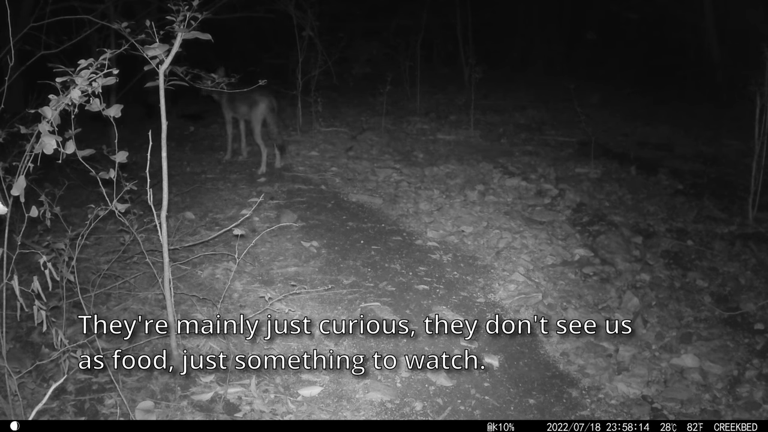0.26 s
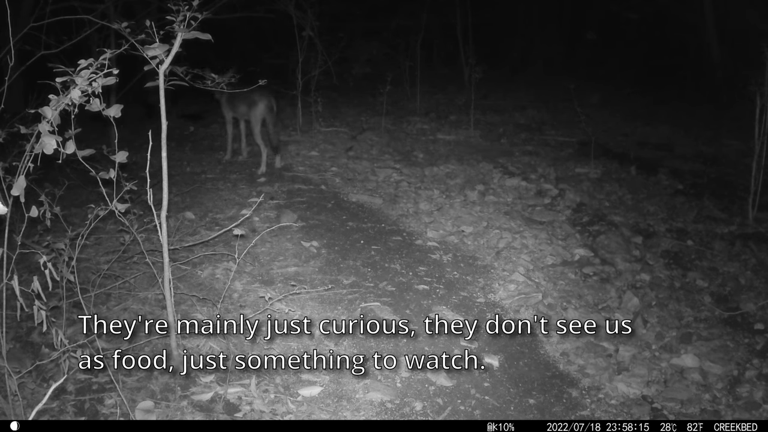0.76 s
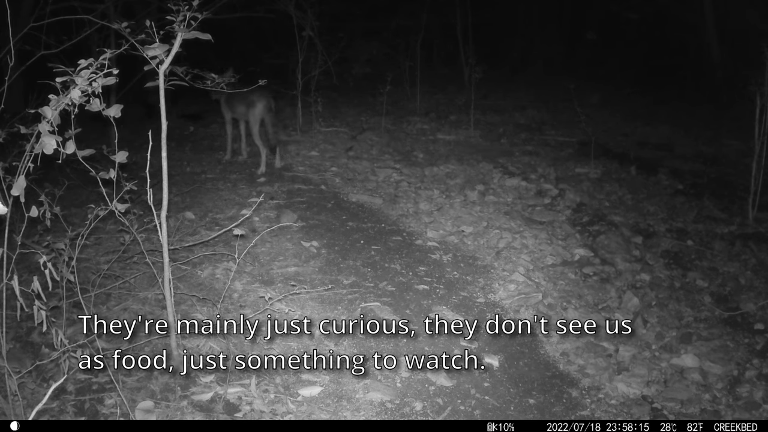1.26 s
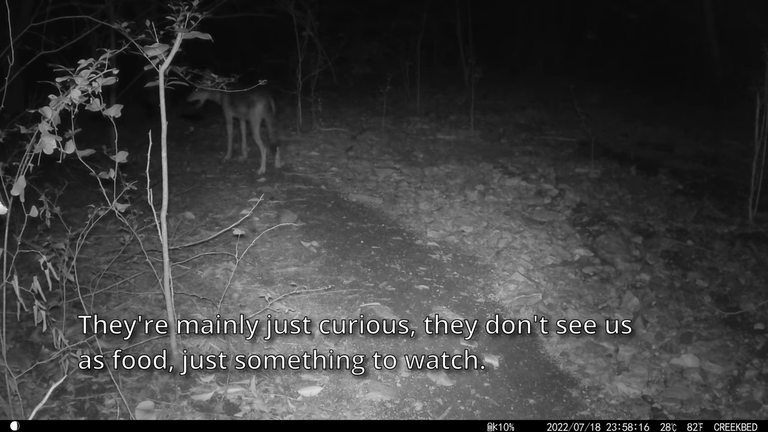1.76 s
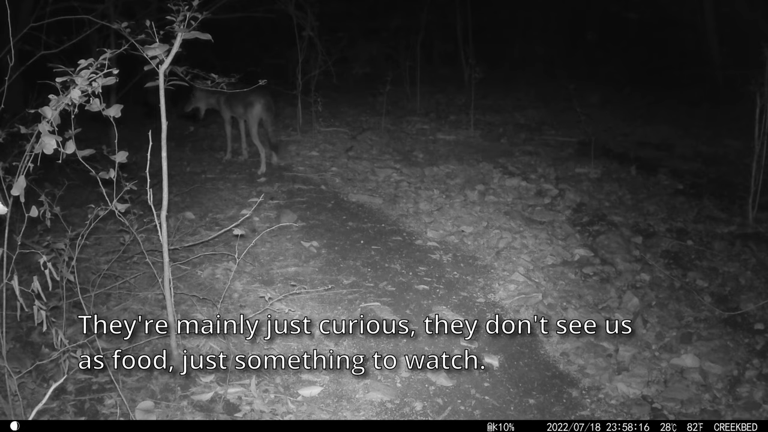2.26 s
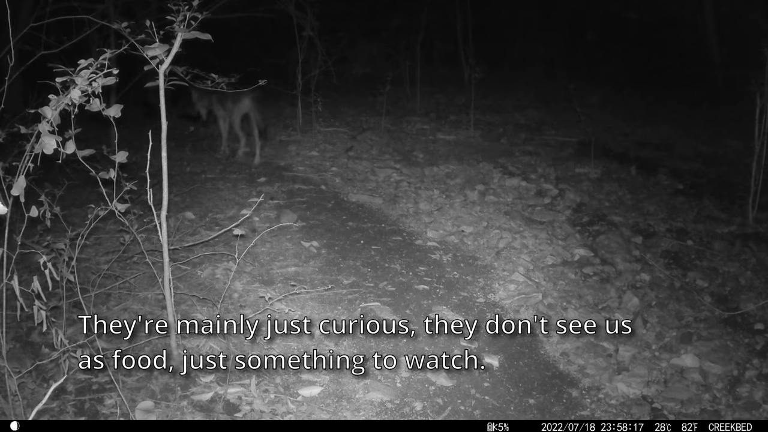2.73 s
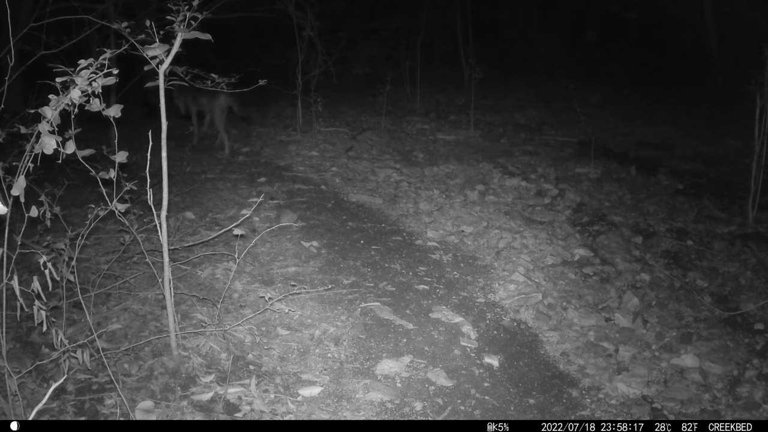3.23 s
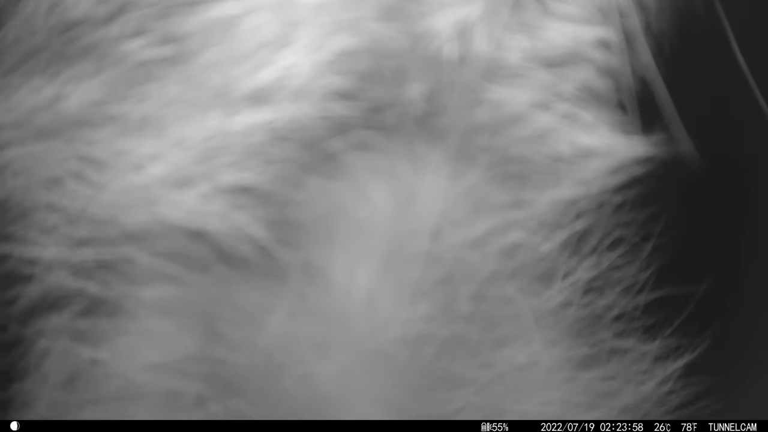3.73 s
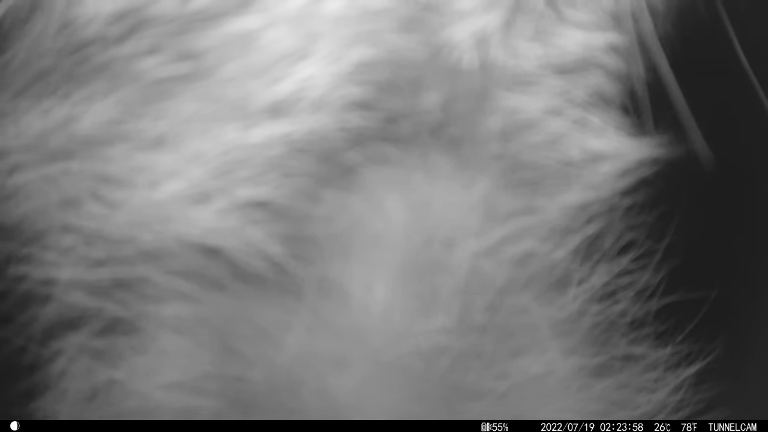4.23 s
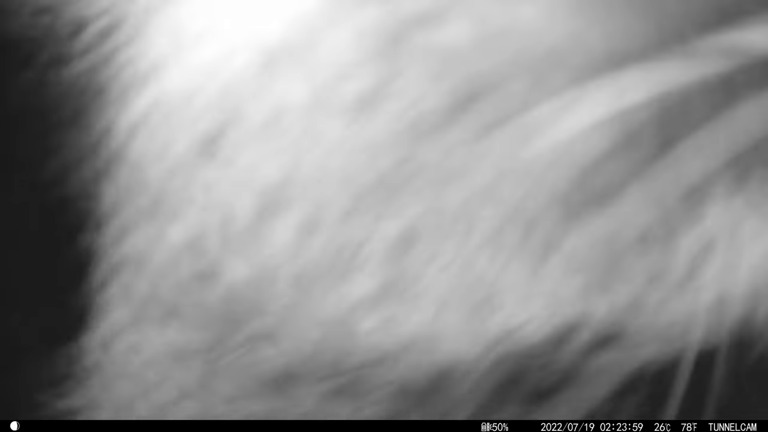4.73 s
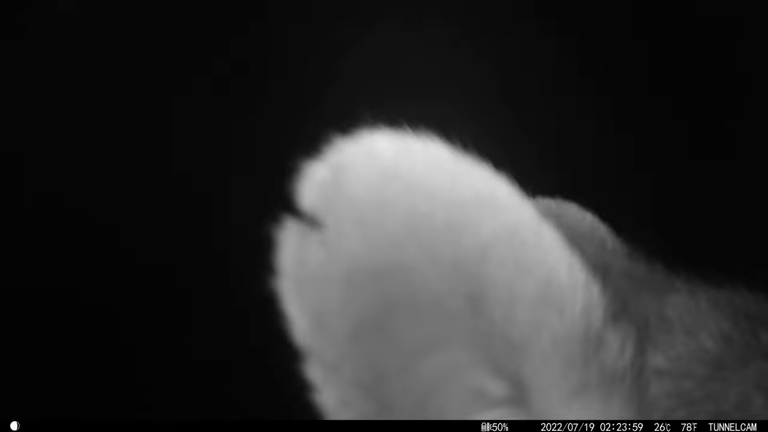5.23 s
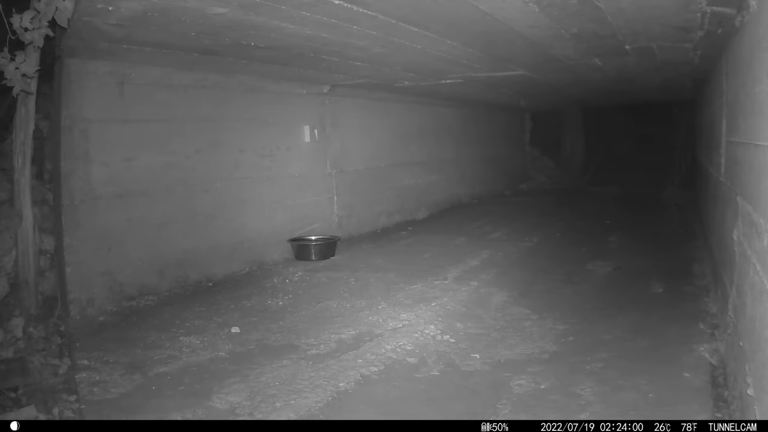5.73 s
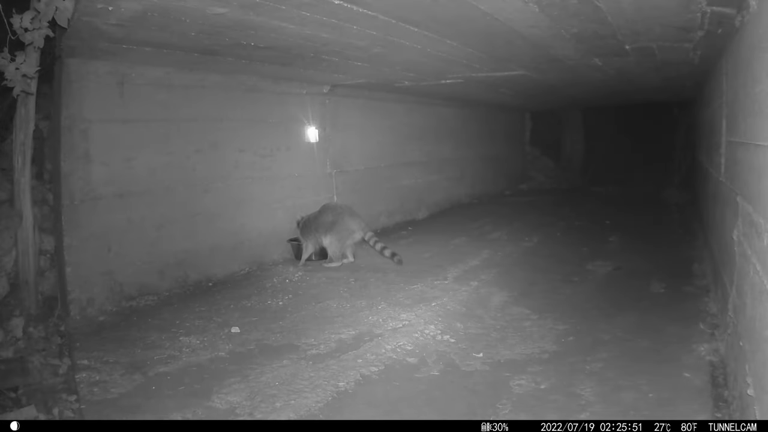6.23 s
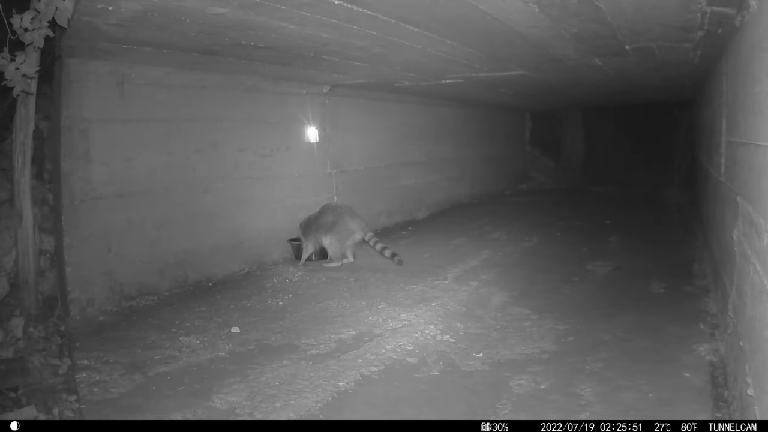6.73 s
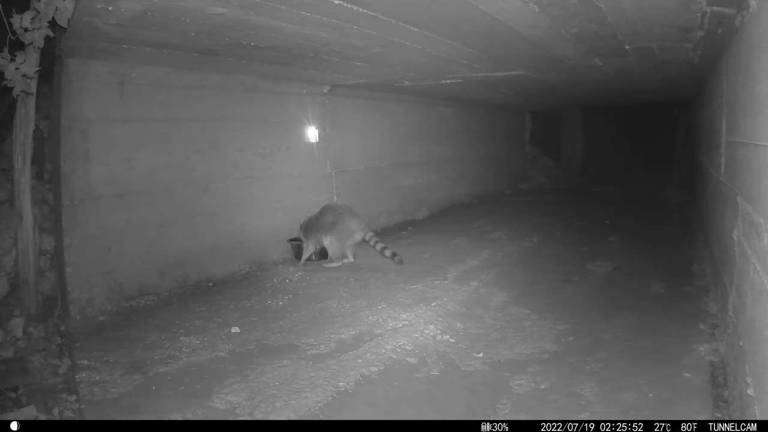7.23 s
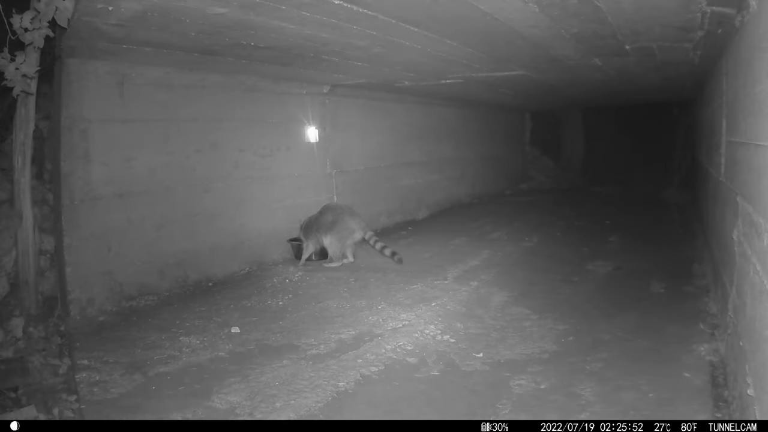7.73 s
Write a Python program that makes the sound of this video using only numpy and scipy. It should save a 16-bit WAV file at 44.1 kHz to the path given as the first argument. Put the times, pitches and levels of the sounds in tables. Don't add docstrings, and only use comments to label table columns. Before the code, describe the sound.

Steady cricket trills and katydid scrapes in a night wood cut abruptly to thumps, a brief electronic whine, and an echoing lower trill with paired chirps.

```python
import sys
import numpy as np
from scipy import signal
from scipy.io import wavfile
from scipy.ndimage import uniform_filter1d

SR = 44100
rng = np.random.default_rng(int(sys.argv[2]) if len(sys.argv) > 2 else 0)


def voltage_ratio(decibels):
    exponent = np.asarray(decibels, float) / 20
    return 10 ** exponent


def wrap_up_sound(samples):
    columns = np.atleast_2d(samples).T
    tamed = np.clip(columns, -1, 1)
    steps = np.round(tamed * 32767).astype(np.int16)
    wavfile.write(sys.argv[1], SR, steps)


N = 352359
TIME = np.arange(N) / SR
CUT_S, WAKE_S = 3.4665, 3.4846

# [start_s, pitch_hz of the middle line, level_db, smear 0-1]
NEAR_TRILL = [
    (0, 4150, -50.5, .3),
    (.3, 4190, -50, .3),
    (.85, 4214, -50.5, .3),
    (1.5, 4198, -51.5, .3),
    (2.0, 4165, -51.5, .4),
    (2.3, 4135, -53, .7),
    (2.5, 4120, -59, .9),
]
JOINING_TRILL = [
    (1.2, 4262, -69, .6),
    (1.45, 4260, -56, .55),
    (1.8, 4256, -51.5, .55),
    (3.47, 4256, -51.5, .6),
]
TUNNEL_TRILL = [
    (3.48, 3948, -48.5, .98),
    (4.3, 3948, -49, .95),
    (4.8, 3948, -51.5, 1),
    (5.4, 3948, -52, 1),
    (6.25, 3946, -50.5, 1),
    (6.4, 3947, -49.5, .8),
    (8, 3947, -49.5, .86),
]
NEAR_LINES = -4, 85.8, [-22, -11, -4, -5, 0, -1, -8, -15, -16, -22, -20, -25]
JOINING_LINES = -3, 84., [-16, -14, -11, 0, -8, -16, -20]
TUNNEL_LINES = -3, 78.8, [-10, -9, -1, 0, -3.5, -16, -15]


def trill(rows, lines, blur_hz, glide, stumbles_s=()):
    hz, level_db, smear = curves(rows)
    smear = np.clip(smear + sum(.5 * bump(s, .11) for s in stumbles_s), 0, 1)
    first, rate, line_db = lines
    stroke_hz = rate * hz / hz.mean()
    tone, strokes = np.exp(2j * np.pi * np.cumsum([hz, stroke_hz], axis=1) / SR)
    line = tone * strokes ** round(first)
    restart = np.exp(2j * np.angle(drift(blur_hz) + 1.1))
    out = np.zeros(N)
    for k, db in enumerate(line_db, round(first)):
        blur = .75 * restart + .65 * drift(blur_hz)
        path = np.sqrt(1 - smear ** 2) * (1 + .22 * drift(4)) + smear * blur
        phase = np.exp(2j * np.pi * glide * k ** 2)
        out += voltage_ratio(db) * (path * line * phase).real
        line = line * strokes
    return voltage_ratio(level_db) * evened(out)


# [first_stroke_s, peak_db]
CHIRPS = [(3.582, -39.5), (3.861, -41.5), (4.134, -42.5), (4.418, -43.5), (4.697, -42), (4.962, -44.5),
          (5.258, -44.5), (5.542, -41.5), (5.821, -41), (6.091, -36.5), (6.55, -38.5), (6.839, -39.5),
          (7.16, -39.5), (7.442, -37.5), (7.74, -38.5), (7.976, -38.5)]


def chirps():
    pair_gap_s, second_db = .0333, .6
    pitch_hz, spread_hz, spread_db = 4211, 26, 1
    sag_hz_per_s, deepen_hz_per_s = 8.9, 36
    out = np.zeros(N + SR)
    strokes = [(s + k * pair_gap_s, db + k * second_db) for s, db in CHIRPS for k in (0, 1)]
    chances = rng.uniform(-1, 1, (len(strokes), 4))
    for (s, db), (longer, deeper, higher, louder) in zip(strokes, chances):
        t = np.arange(round(.0185 * (1 + .12 * longer) * SR)) / SR
        part = t / t[-1]
        awake_s = s - WAKE_S
        start_hz = pitch_hz - sag_hz_per_s * awake_s + spread_hz * higher + 30
        sink_hz = (90 + deepen_hz_per_s * awake_s) * (1 + .089 * deeper)
        tone = np.sin(2 * np.pi * np.cumsum(start_hz - sink_hz * part ** 2) / SR)
        shape = signal.windows.tukey(len(t), .6) * (.88 + .25 * part)
        at = round((s - .0045) * SR)
        out[at:at + len(t)] += voltage_ratio(db + spread_db * louder) * shape * tone
    tail = rng.standard_normal(SR // 2) * voltage_ratio(-60 * TIME[:SR // 2] / .15)
    echo = signal.fftconvolve(out, tail / np.linalg.norm(tail))[:N]
    return out[:N] + voltage_ratio(-14) * echo


# [middle_s, length_s, peak_db, pitch_hz]
WOOD_KATYDIDS = [(.13, .15, -64, 7700), (.46, 0.7, -60.5, 7800), (.98, 0.62, -68, 7850),
                 (1.22, 0.43, -65, 7550), (1.64, 0.38, -59.5, 7830), (1.96, .12, -63, 7800),
                 (2.12, 0.29, -63, 8000), (2.33, .2, -65, 7850), (2.56, 0.3, -60.5, 7800),
                 (2.74, .15, -65, 7830), (3.01, 0.42, -63.5, 7800), (3.46, 0.16, -61.5, 8000)]
TUNNEL_KATYDIDS = [
    (4.45, .3, -75, 7700),
    (4.97, .25, -71, 7300),
    (5.93, .2, -71, 7300),
    (6.15, .3, -74, 7800),
    (6.75, .5, -78, 7650),
    (7.3, .6, -75, 7550),
    (7.85, .4, -72, 7650),
]
# [level_db, pitch_hz]
CHORUS = (-67.5, 7780), (-76, 7600)


def katydids(bouts, chorus, width_hz):
    chorus_db, chorus_hz = chorus
    gains = [voltage_ratio(db) * bump(s, length) for s, length, db, _ in bouts]
    gains = np.array(gains + [voltage_ratio(chorus_db) + 0 * TIME])
    power = (gains ** 2).sum(0)
    hz = np.array([row[-1] for row in bouts] + [chorus_hz]) @ gains ** 2 / power
    out = np.zeros(N)
    for offset_hz in (-260, 0, 240):
        click_db = 3 * drift(6).real + 2.5 * drift(50).real - abs(offset_hz) / 70
        clicks = rng.standard_normal(N) * voltage_ratio(click_db)
        wing_hz = hz + offset_hz + 90 * drift(4).real
        out += evened(resonate(clicks, wing_hz, width_hz)) * clicks.std()
    return np.sqrt(power) * evened(out)


# [start_s, peak_db, pitch_hz, width_hz, fade_s to -60 dB]
TAPS = [(2.085, -55, 6960, 2500, .08), (2.603, -52, 6300, 2500, .03), (2.72, -56, 6350, 300, .05),
        (2.74, -55, 6330, 300, 0.041), (6.235, -48.5, 320, 300, 0.052), (6.289, -43, 3180, 1200, 0.038),
        (6.311, -60, 2800, 1200, 0.08), (6.35, -61, 1120, 130, 0.13), (6.385, -62, 1110, 120, 0.43),
        (6.48, -61, 1240, 300, 0.22), (3.399, -65, 3520, 60, 0.29), (6.565, -58, 550, 300, 0.067),
        (6.874, -48.5, 2420, 2000, 0.078), (6.876, -54, 550, 400, 0.066), (6.92, -53, 2900, 1800, 0.07),
        (7.775, -54.5, 1610, 497, 0.081)]


def taps():
    out, t = np.zeros(N + SR), TIME[:SR // 5]
    for s, db, hz, width_hz, fade_s in TAPS:
        at = round(s * SR)
        ring = evened(resonate(rng.standard_normal(len(t)), hz, width_hz))
        out[at:at + len(t)] += voltage_ratio(db - 60 * t / fade_s) * ring * np.minimum(t / .0025, 1)
    return out[:N]


# [time_s, level_db]
ENGINE = [
    (4.4, -63),
    (5.4, -67.5),
    (6.6, -60),
    (7.99, -53.5),
]


def engine():
    level_db = curves(ENGINE)[0] + .5
    return voltage_ratio(level_db) * evened(resonate(rng.standard_normal(N), 133.8, 31.7))


# [pitch_hz, level_db per Hz]
WOOD_AIR = [(120, -46), (200, 2), (236, -3), (377, -9), (856, -9), (1880, -15), (3300, -23), (4290, -26),
            (7260, -120)]
TUNNEL_AIR = [(120, -32), (200, -6), (247, -3.5), (744, -9.5), (1110, -10.5), (1450, -12), (3300, -18),
              (4290, -32), (7260, -120)]
WOOD_RUMBLE = [(7.1, -33), (12, -12), (42, 3.5), (67, 2), (130, -6.5), (151, -8.5), (172, -16), (204, -33),
               (232, -31), (260, -25), (340, -75), (570, -120)]
TUNNEL_RUMBLE = [(7, -33), (12, -6.5), (32, 0), (45, -1), (58, -5), (76, -16.5), (97, -20.5), (135, -21),
                 (181, -23.5), (260, -33.5), (340, -56)]
HISS = [(1500, -23), (3000, 2), (6000, 2), (9000, 0.5), (12400, 1.5), (15300, -16), (15700, -60)]
# [rumble_db, air_db, share of a swell that the air follows]
TRAFFIC = (-47.5, -58, 0.1), (-44.5, -61, -0.04)
# [middle_s, length_s, rise_db]
SWELLS = [
    [(.3, .5, 2.5), (1.35, 0.3, 3.1), (2.4, 2.2, 5), (3.2, 0.39, 3.7)],
    [(4.02, .5, 4), (4.9, 0.34, 2.7), (6.5, 2, 3.2), (7.55, 0.31, 1.8)],
]


def place(rumble, air, index, hiss_db):
    rumble_db, air_db, share = TRAFFIC[index]
    swell_db = sum(db * bump(s, length) for s, length, db in SWELLS[index])
    out = voltage_ratio(rumble_db + swell_db) * noise(rumble, .62, size=8192)
    out += voltage_ratio(air_db + share * swell_db) * noise(air, .88, size=2048)
    return out + voltage_ratio(hiss_db) * noise(HISS, .89, size=1024)


def noise(shape, patchy_db, size):
    hz = np.fft.rfftfreq(size, 1 / SR)
    a, b, patches = rng.standard_normal((4 * N // size + 5, len(hz), 3)).T
    patches = uniform_filter1d(patches, size=20, axis=0)
    patches = evened(uniform_filter1d(patches, size=5, axis=1))
    f, db = np.transpose(shape)
    colour_db = np.interp(np.log(hz + 1), np.log(f + 1), db)[:, None]
    z = (a + 1j * b) * voltage_ratio(colour_db + patchy_db * patches)
    return evened(signal.istft(z, nperseg=size, noverlap=3 * size // 4)[1][:N])


def resonate(x, hz, width_hz):
    turn = np.exp(2j * np.pi * np.cumsum(hz * np.ones(len(x))) / SR)
    r = np.exp(-np.pi * width_hz / SR)
    return (turn * signal.lfilter([1], np.convolve([1, -r], [1, -r]), x / turn)).real


def drift(hz):
    count = N // 64 + 2
    z = rng.standard_normal(count) + 1j * rng.standard_normal(count)
    z = evened(signal.lfilter(*signal.butter(2, hz, fs=SR / 64), z))
    return np.interp(np.arange(N) / 64, np.arange(count), z)


def bump(middle_s, length_s):
    return np.maximum(1 - (2 * (TIME - middle_s) / length_s) ** 2, 0) ** 2


def curves(rows):
    s, *columns = np.transpose(rows)
    return [np.interp(TIME, s, c) for c in columns]


def evened(x):
    return x / np.sqrt(np.mean(abs(x) ** 2) + 1e-20)


def scene():
    wood = trill(NEAR_TRILL, NEAR_LINES, 25, .12, stumbles_s=[.79, 1.08])
    wood += trill(JOINING_TRILL, JOINING_LINES, 25, .1, stumbles_s=[2.2, 2.83])
    wood += katydids(WOOD_KATYDIDS, CHORUS[0], 540)
    wood += place(WOOD_RUMBLE, WOOD_AIR, index=0, hiss_db=-61)
    tunnel = trill(TUNNEL_TRILL, TUNNEL_LINES, 18, .105)
    tunnel += chirps() + katydids(TUNNEL_KATYDIDS, CHORUS[1], 400) + engine()
    tunnel += place(TUNNEL_RUMBLE, TUNNEL_AIR, index=1, hiss_db=-62.5)
    left = wood * (TIME < CUT_S) + tunnel * (TIME >= WAKE_S) + taps()
    return np.array([2 * left, 0 * left])


# [start_s, level_db from then on]
GAIN_STEPS = [
    (3.4846, -2),
    (3.5488, 4.5),
    (3.8147, 3),
    (4.0066, 1.5),
    (4.2791, 0),
]


def gain_steps(x):
    s, step_db = np.transpose(GAIN_STEPS)
    return x * voltage_ratio(np.append(0, step_db)[np.searchsorted(s, TIME)])


# [start_s, size of full scale, decay_s]
JOLTS = [
    (3.5488, .24, .005),
    (3.8147, -.08, .0012),
    (4.0066, -.03, .003),
    (4.2791, -.02, .002),
]


def jolts():
    out = np.zeros(N)
    for at, size, decay_s in JOLTS:
        out += size * np.exp(-abs(TIME - at) / decay_s) * np.clip((TIME - at) / 5e-5, 0, 1)
    return out


def bias():
    t, late = TIME - WAKE_S, np.maximum(TIME - JOLTS[0][0], 0)
    surge = .13 * (1 - .45 * np.exp(-abs(t) / .004)) * np.cos(np.pi / 2 * t / .075)
    kick = .125 * np.exp(-late / .028)
    undershoot = .06 * (1 + late / .22) * np.exp(-late / .22)
    return np.where(late > 0, kick - undershoot, surge) * (t >= 0)


def whine(x):
    start_s, end_s, top_hz = 3.8, 4.29, 17000
    slow = signal.lfilter(*signal.butter(2, 160, fs=SR), x)
    settling = np.exp((start_s - np.maximum(TIME, start_s)) / .29)
    drive_hz = 30000 - 65000 * settling - 170000 * slow
    hz = top_hz * np.tanh(drive_hz / top_hz) + 800 * drift(300).real
    heard = np.clip((15600 - abs(hz)) / 500, 0, 1) * (TIME > start_s) * (TIME < end_s)
    turn = 2 * np.pi * np.cumsum(hz) / SR
    overtone = .4 * np.sin(2 * turn) * (abs(hz) < 5500)
    level_db = -45 - .0001 * abs(hz) + 1.9 * drift(73).real
    return voltage_ratio(level_db) * heard * (np.sin(turn) + overtone)


TOP_BANDS_HZ = [12650, 13400, 14100, 14800, 15500]


def top_gate(x, open_db):
    hz, t, z = signal.stft(x, SR, nperseg=512)
    for lo, hi in zip(TOP_BANDS_HZ, TOP_BANDS_HZ[1:]):
        band = (hz >= lo) & (hz < hi)
        busy = uniform_filter1d((abs(z[band]) ** 2).sum(0), size=15) > voltage_ratio(2 * open_db)
        waking = (t > 3.47) & (t < 3.58 + .04 * (lo < 14500))
        again = (abs(t - 3.72) < .025) & (lo > 13000) & (hi < 15000)
        z[band] *= busy | waking | again
    z[hz >= hi] = 0
    return signal.istft(z, SR, nperseg=512)[1][:N]


def band_limit(x):
    return signal.sosfilt(signal.butter(12, 16150, fs=SR, output="sos"), x)


def record(dry):
    left = gain_steps(dry[0]) + bias()
    left += whine(left)
    left -= .045 * ((TIME - CUT_S) / .014) ** 2 * (TIME >= CUT_S) * (TIME < 3.4806)
    left += jolts()
    left = top_gate(left, open_db=-68.5)
    return band_limit(np.array([left, dry[1]]))


dry = scene()
out = record(dry)
wrap_up_sound(out)
```